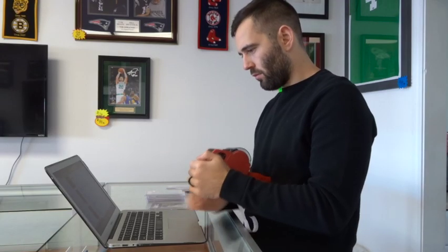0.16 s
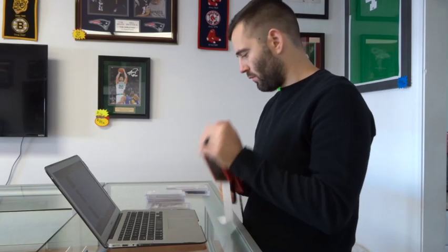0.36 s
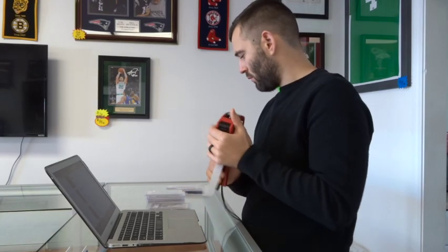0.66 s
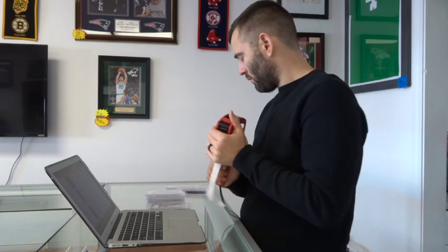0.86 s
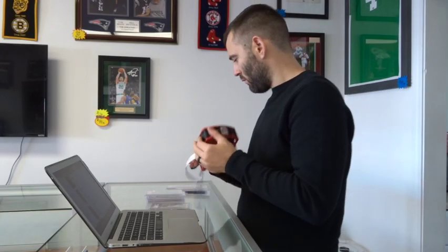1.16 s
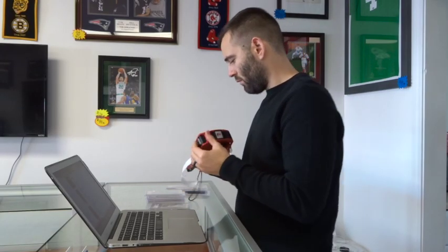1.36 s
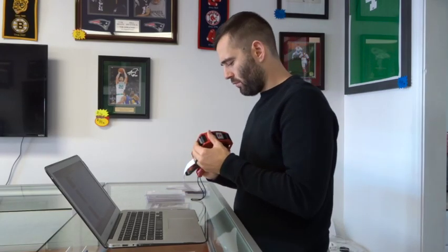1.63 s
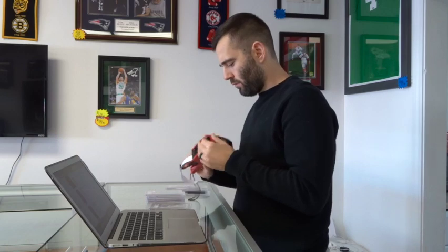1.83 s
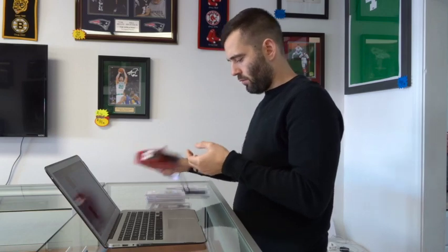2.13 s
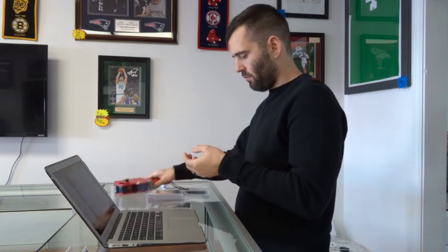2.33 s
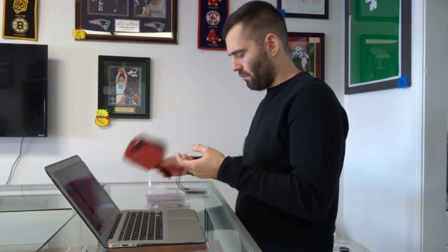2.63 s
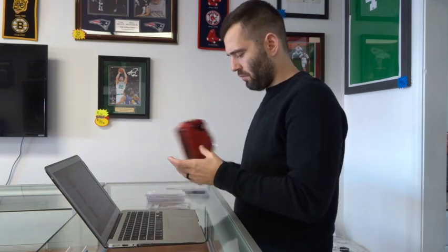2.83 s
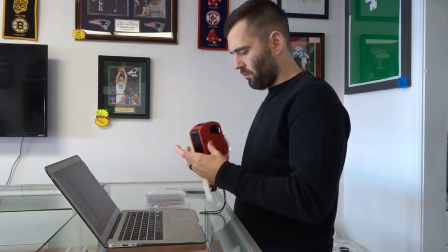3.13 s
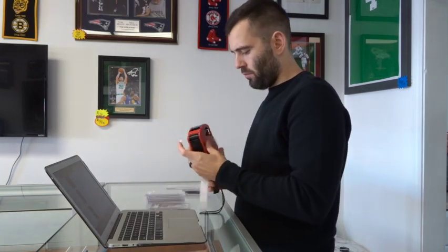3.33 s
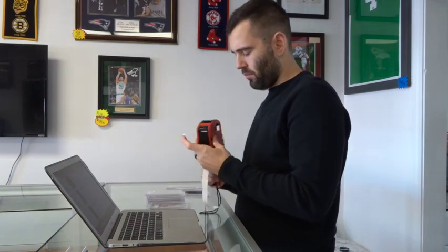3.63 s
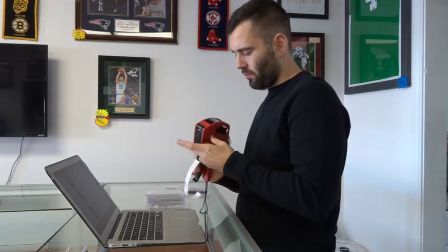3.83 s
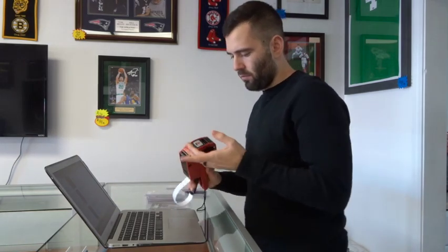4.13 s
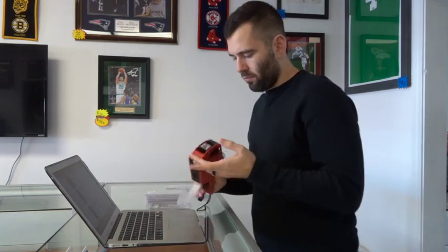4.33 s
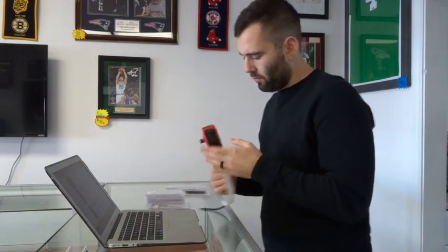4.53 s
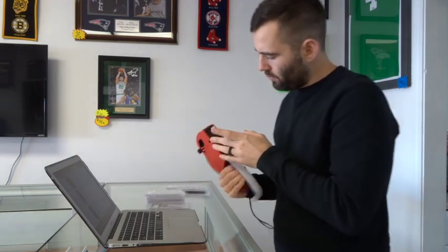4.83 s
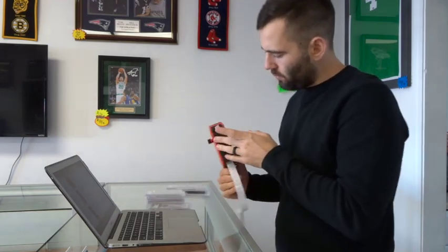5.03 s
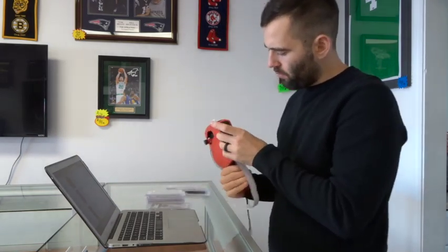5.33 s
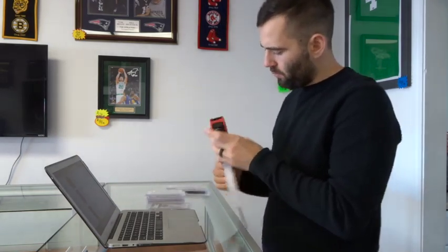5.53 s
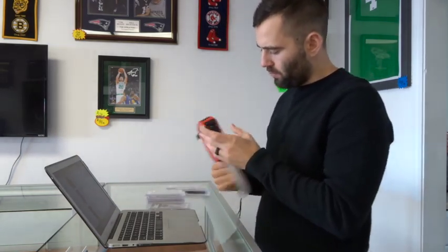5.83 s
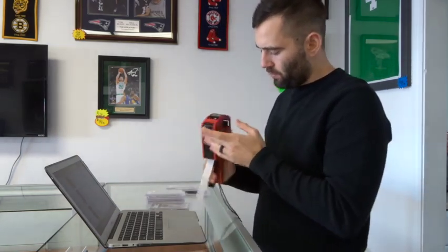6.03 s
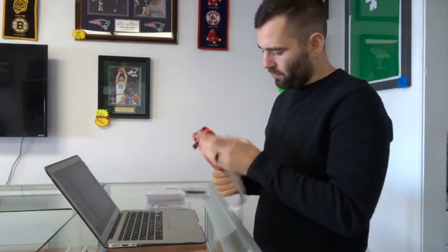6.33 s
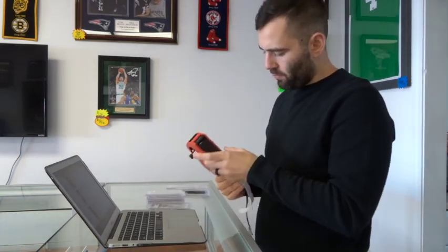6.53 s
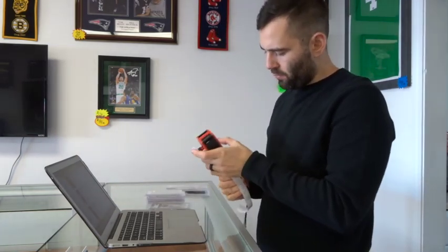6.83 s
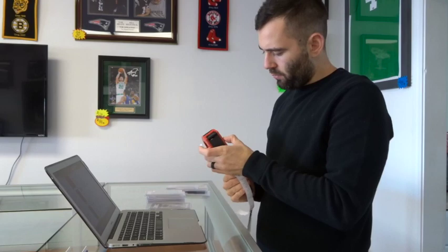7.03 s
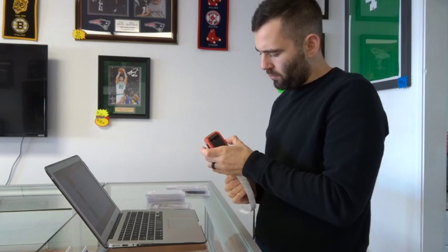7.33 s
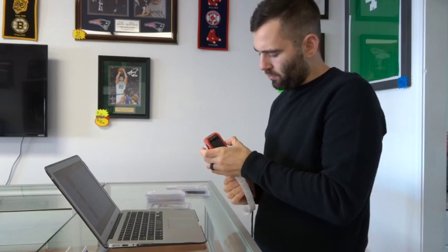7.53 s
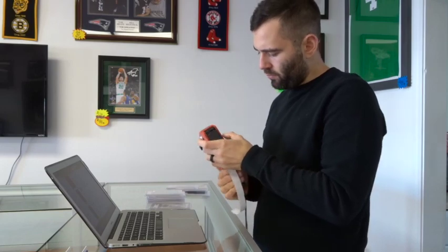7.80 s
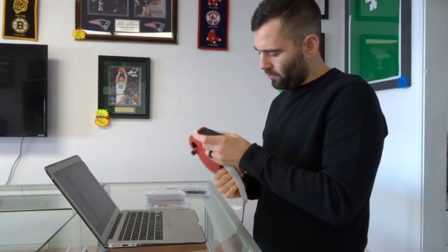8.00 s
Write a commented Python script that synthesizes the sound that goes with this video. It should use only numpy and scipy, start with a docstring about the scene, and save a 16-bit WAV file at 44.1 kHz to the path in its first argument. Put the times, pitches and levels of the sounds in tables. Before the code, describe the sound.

A man handles a plastic label gun at a glass counter. Quick clicks build to hard clacks and a rattling trigger slam, then lighter fumbling, a solid knock on the counter, a busy run of snaps and two more trigger slams. After a quieter fiddly spell come a tight crackling cluster and a few bright latch snaps. Close stereo pickup, short bright room tail, low ventilation rumble and wavering hum.

```python
"""Hard-walled shop: a hand-held plastic label gun is turned over, opened, tapped and squeezed.
Each contact is a short rattle of micro-impacts ringing hollow body, side wall, shell, edge and latch modes;
slams are runs of touches, a spring pings, the counter knocks, and random slips make a rustle.
Decaying stereo noise gives the room tail, over ventilation rumble, a wavering hum, a narrow drone and hiss."""
import sys
import numpy as np
from scipy import signal
from scipy.fft import rfft, irfft
from scipy.io import wavfile
from scipy.ndimage import uniform_filter1d

SR = 44100
rng = np.random.default_rng(int(sys.argv[2]) if len(sys.argv) > 2 else 0)


def to_wav(sig):
    """Store sig (one row per channel, or 1-D mono) as 16-bit WAV at the path in sys.argv[1].

    Samples outside -1..1 are clipped; the rate is SR.
    """
    pcm = np.clip(np.atleast_2d(sig), -1, 1) * 32767
    pcm = np.round(pcm).astype(np.int16)
    wavfile.write(sys.argv[1], SR, pcm.T)  # frames by channels


N = 360027

# Rumble, wash and hiss spectrum: pitch_hz, density_db (per Hz, relative within each layer)
AIR_SPECTRUM = [(12, -36), (20, -1), (70, -6.5), (101, -4), (136, -3.5), (182, -3), (237, -9.5), (271, -10),
                (363, -3.5), (414, -32), (570, -22.5), (1110, -29), (7130, -48.5), (10600, -50),
                (11500, -63), (15000, -107.5), (22000, -120)]
# Left-right correlation of the air: pitch_hz, correlation (0-1)
AIR_CORRELATION = [(60, 0.99), (130, 1), (270, 0.95), (580, 0.77), (1220, 0.36), (2600, 0), (5520, -0.0),
                   (11000, 0.16), (11700, .6)]
# Air levels: time_s, rumble_db, wash_db (wash before WASH_TRIM_DB)
AIR_LEVELS = [(0, -50, -58.5), (1.2, -53, -56), (3.6, -53.5, -57.5), (4.3, -51, -56), (5.5, -49.5, -58),
              (6.6, -53, -59.5), (8.16, -53, -58.5)]
WASH_TRIM_DB, HISS_DB = -1.0, -70.5
# Wavering hum: time_s, pitch_hz, level_db, octave_db
HUM_TRACK = [(0.0, 90, -57, -61), (0.72, 103, -55, -67), (1.1, 103, -53.5, -76), (1.5, 93, -57, -98),
             (2.2, 107, -61, -55), (2.75, 107.5, -55.5, -57), (3.2, 100, -61.5, -63.5),
             (4.4, 100, -69, -55.5), (5.1, 92, -63, -54), (5.4, 94, -52.5, -51), (5.75, 96, -49, -52.5),
             (5.95, 100, -58, -57.5), (7.84, 100, -52, -61), (8.16, 103, -62, -56)]
DRONE_HZ, DRONE_WIDTH_HZ, DRONE_DB = 242.2, 5.1, -58.5

# Decay of the shop: pitch_hz, t60_s
SHOP_DECAY = [(300, 0.5), (800, 0.32), (2000, 0.33), (5500, 0.38), (11000, 0.29)]
# Echo strength of the shop: pitch_hz, level_db
SHOP_LEVELS = [(300, -11), (1000, -4.5), (3000, -5), (10000, -2)]
# Left-right correlation of the echoes: pitch_hz, correlation (0-1)
SHOP_CORRELATION = [(130, 0.86), (270, 0.81), (580, 0.83), (1220, 0.87), (2600, 0.79), (5500, 0.042),
                    (11000, 0.011)]
SHOP_ONSET_S = 0.0021

# Fingers and paper strip moving on the gun: time_s, level_db (before RUSTLE_TRIM_DB)
RUSTLE_LEVELS = [(0.0, -83), (0.25, -49), (0.72, -51), (1.1, -55), (1.7, -49), (2.7, -51.5), (3.0, -65),
                 (3.3, -52.5), (4.15, -60), (4.4, -46.5), (4.9, -59.5), (5.5, -63), (6.15, -54), (6.5, -54),
                 (6.7, -73), (7.55, -84.5), (8.16, -54)]
# Broad gun resonances colouring the slips: pitch_hz, width_hz, level_db
RUSTLE_RESONANCES = [(900, 170, 4.5), (1710, 590, 5), (2370, 600, -2.5), (3900, 900, -8.5),
                     (7000, 21000, -24.5)]
RUSTLE_SLIPS_PER_S, RUSTLE_TRIM_DB = 1500, -14.5
# Loose parts shake on after each contact, relative to its level
SHAKE_DB, SHAKE_RISE_S, SHAKE_FALL_S = -32, 0.032, 0.046

# Knocks on the counter: start_s, level_db, main_pitch_hz, upper_mode_t60_s
COUNTER_KNOCKS = [(2.332, -27.5, 193, 0.063), (4.367, -34.5, 566, 0.051), (5.953, -44, 193, 0.048)]
# Spring pings: start_s, level_db
SPRING_PINGS = [(0.6983, -33.5), (2.7666, -40), (2.7894, -47), (4.5725, -42), (4.6319, -52.5),
                (4.6962, -54), (5.7453, -53), (6.2886, -54.5), (6.323, -50)]
# Spring modes: pitch_hz, level_db, t60_s
SPRING_MODES = [(4480, -3, .05), (4470, -4, 0.052), (4610, -5, .04)]

# Modes of the hollow body: pitch_hz, level_db, t60_s
HOLLOW_MODES = [(696, -13.5, 0.0082), (763, -5.5, 0.089), (806, -2.5, 0.058), (880, -1, 0.055),
                (918, -6, 0.16), (951, 5.5, 0.087), (1022.3, 1, 0.095), (1090, 1.5, 0.04)]
# Modes of the side wall: pitch_hz, level_db, t60_s
WALL_MODES = [(1511, -12.5, 0.02), (1597, -7.5, 0.027), (1635, -6.5, 0.028), (1696, -6, 0.03),
              (1860, -8, 0.014)]
# Modes of the shell: pitch_hz, level_db, t60_s
SHELL_MODES = [(2040, -3, .005), (2250, -3, .006), (2400, -6, .012), (2650, -2, .005)]
# Modes of the edge: pitch_hz, level_db, t60_s
EDGE_MODES = [(2880, -2, .005), (3100, -3, .005), (3350, -2, .006), (3650, -3, .004)]
# Modes of the latch: pitch_hz, level_db, t60_s
LATCH_MODES = [(3950, -3, .004), (4250, -2, .005), (4560, -3, .005), (4850, -3, .004)]
# Crack spectrum: pitch_hz, density_db (per Hz)
CRACK_SPECTRUM = [(4500, -31), (5400, 5), (6600, 5), (8000, -1), (9500, -1), (11500, -10)]
# Radiation of hollow, side wall, shell, edge, latch, crack: level_db
RADIATION_DB = [-3.5, -7, -3.5, -5, -2, -3.5]
# Reference pitch of shell, edge, latch: pitch_hz
CASE_PITCHES_HZ = [2350, 3200, 4400]
CASE_FALL_DB_PER_OCTAVE, CASE_SPREAD_DB = 12, 3.5  # fall away from the struck pitch; chance spread
CLICK_DB, STRIKE_SPREAD_DB = -9.5, 4  # click re mean of shell, edge, latch; unevenness of mode strikes
# Opening impact re the chatter; swell time at 10 ms rattle, growing as rattle squared
FIRST_IMPACT_DB, SWELL_MS = 16.5, 0.4
# Contacts: start_s, level_db, hollow_db, wall_db, case_db, case_pitch_hz, crack_db, rattle_ms
GUN_CONTACTS = [(0.119, -47.5, -18, -3, -12.5, 2180, -24, 8.7),
                (0.266, -38.5, -5.5, -8, -2, 2620, -11.5, 10), (0.443, -37.5, -11, -17, -12, 2760, -21, 6),
                (0.494, -31, -16.5, -13, -7.5, 2620, -32, 10), (0.577, -28, -18, -18, -4, 2770, -34, 7.8),
                (0.607, -27, -6, -9, -13, 2540, -41, 6.8), (0.628, -24.5, -10, -8, -7, 2360, -41, 5.5),
                (0.673, -28, -3, -10, -7, 2540, -25, 6.4), (0.698, -23.5, -17, -22, -7.5, 4560, -27, 8.5),
                (0.737, -19.5, -12, -12, -8.5, 2780, -21, 5.3),
                (0.769, -23.5, -13, -14, -9.5, 2100, -18, 14),
                (0.918, -19.5, -11.5, -21, -15, 2600, -24, 9.9),
                (0.937, -9, -27, -18.5, -17, 2260, -19.5, 5.7), (0.97, -19, -4, -17, -9, 2480, -15, 6.8),
                (0.979, -19, -7, -15, -3, 2040, -22, 5.6), (1.205, -35, -26, -38, -5, 2090, -17, 8.8),
                (1.817, -29.5, -7, -24, -11, 2770, -14, 10), (1.827, -30.5, -15, -27, -4, 2000, -13, 7.5),
                (1.851, -26, -28, -24, -0.5, 3200, -9, 6.9), (1.858, -23.5, -9, -18, -2.5, 3470, -13, 6.1),
                (2.156, -29, -18, -14, -11, 2320, -35, 7.5), (2.17, -35, -3, -13, -22, 2270, -33, 6.4),
                (2.33, -12, -33, -7, -5, 2450, -24, 9.1), (2.582, -29.5, -6.5, -5.5, -24, 2740, -33, 7.5),
                (2.601, -21, -12.5, -15, -26, 2100, -35, 8.8),
                (2.698, -15.5, -17, -14.5, -11, 2570, -17, 6.8),
                (2.734, -27.5, -15, -8, -9, 3260, -18, 6.2), (2.766, -34, -28, -18, -10, 4640, -17, 5.8),
                (2.841, -17, -14, -18, -15.5, 2460, -27, 6.7),
                (2.863, -13, -13.5, -23, -16, 2460, -23.5, 5.9), (2.887, -24, -7, -20, -15, 2430, -29, 8.4),
                (2.948, -11.5, -10.5, -18, -10, 2600, -9.5, 7),
                (3.162, -38.5, -12, -18, -12, 2900, -18, 9.2),
                (3.182, -35.5, -5.5, -14, -9, 2260, -16, 11.2),
                (3.204, -27, -9.5, -12, -11.5, 2500, -25, 8.1),
                (3.277, -31, -11, -11, -6.5, 2650, -23, 8.9), (3.302, -36.5, -8, -18, -3.5, 2720, -16, 6.1),
                (3.458, -43, -6, -19, -10.5, 2360, -22, 14), (3.51, -26, -16, -12, -15.5, 2310, -21, 15.4),
                (3.673, -18, -18, -13, -7.5, 2330, -12, 8),
                (3.92, -24.5, -16, -19, -12.5, 3400, -16.5, 8.6),
                (3.987, -12, -28, -27, -9, 3630, -19, 9.8),
                (4.015, -12.5, -16.5, -37, -5.5, 2550, -21, 8.1),
                (4.225, -35.5, -2.5, -5, -7.5, 2310, -24, 7.5),
                (4.368, -23.5, -19, -27, -18.5, 2050, -51, 8.6),
                (4.572, -29, -18, -11, -12, 4620, -30, 9.8), (4.632, -35, -16, -13, -13, 2270, -27, 6.1),
                (4.697, -34.5, -16, -11, -10, 2220, -34, 8.7),
                (4.771, -39.5, -13, -10, -16.5, 2330, -29, 7.9), (5.203, -40, -13, -14, -8, 2300, -38, 7.5),
                (5.576, -39, -6.5, -5.5, -11.5, 2680, -35, 6.9),
                (5.686, -32, -15, -10.5, -11.5, 2400, -29, 5.8),
                (5.745, -34.5, -16, -10, -11.5, 2310, -27, 8.3),
                (5.944, -30.5, -9.5, -7, -8.5, 2710, -24, 7), (5.954, -20, -21, -13, -7.5, 2630, -16, 7.7),
                (5.993, -22, -7, -10, -10, 2500, -28, 8.8), (6.059, -14.5, -25.5, -26, -3, 2470, -13, 9.1),
                (6.072, -18, -22, -20, -3, 2400, -17.5, 5.8), (6.085, -20.5, -27, -27, 2.5, 2790, -7, 7.8),
                (6.106, -20.5, -26, -26, -0.5, 2600, -25, 8.3),
                (6.119, -17, -16, -30, -3.5, 3100, -17.5, 9.1),
                (6.288, -36.5, -13, -8, -7.5, 2800, -23, 5.3), (6.323, -36.5, -16, -14, -24, 4510, -25, 7),
                (7.393, -43.5, -7, -9, -16, 2130, -38, 7.7), (7.485, -44.5, -12, -8, -15, 2910, -34, 7.8),
                (7.584, -24.5, -19, -16, -14.5, 2200, -23, 11),
                (7.63, -16.5, -11.5, -9, -9, 2520, -16, 9.5),
                (7.642, -13.5, -40, -25, -10.5, 4240, -5.5, 8.9),
                (7.652, -13, -28, -22, -12, 4400, -9, 10.6), (7.813, -10, -27, -21, -10, 3570, -10.5, 7.1),
                (7.893, -34.5, -17, -26, -6, 2660, -22, 8.5),
                (8.041, -34.5, -12, -34, -11, 2660, -11.5, 7.7), (8.14, -42, -4, -22, -13, 2970, -14, 9.3)]
# Trigger slams home: the contact columns for the main blow, then lead_loss_db per earlier touch
TRIGGER_SLAMS = [(0.801, 2, -19, -20, -15, 3020, -17, 8.3, 11.4),
                 (1.324, 6, -18.5, -15, -14, 3130, -19, 6.54, 8.2),
                 (3.551, 0.5, -14, -15, -12.5, 2470, -15, 9, 8),
                 (3.727, 1, -16, -13, -12.5, 2900, -12.5, 9.3, 6.5)]
TOUCH_S, REBOUND_DROP_DB, REBOUND_LOSS_DB, LIGHT_TOUCH_HOLLOW_DB = 0.0094, 4.5, 3, 5.5
# Gun moved out over the counter and back: time_s, left_minus_right_db
GUN_PLACE = [(0, -2), (1.9, -1.5), (2.2, 1.5), (2.7, -.3), (3.0, -1.5), (8.16, -1.7)]

# Recorder: gain control and top cut
LIMIT_DB, CUT_DB_PER_DB, RELEASE_DB_PER_S, CUTOFF_HZ = -17, 0.8, 164.5, 11050


def from_db(db):
    """Amplitude of a level in dB."""
    return 10 ** (np.asarray(db) / 20)


def rms_one(x):
    """Scales a signal to RMS 1."""
    return x / np.sqrt(np.mean(x ** 2) + 1e-20)


def in_time(rows):
    """Interpolates table columns to one value a sample."""
    time_s, *columns = np.transpose(rows)
    return [np.interp(np.arange(N) / SR, time_s, column) for column in columns]


def at_hz(points, hz):
    """Interpolates a table over log frequency."""
    point_hz, value = np.transpose(points)
    return np.interp(np.log(hz), np.log(point_hz), value)


def drift(rate_hz):
    """Slow random wander of RMS 1: noise through a double pole, computed every 40 samples."""
    pole = np.exp(-80 * np.pi * rate_hz / SR)
    noise = rng.standard_normal(N // 40 + 2002)
    slow = signal.lfilter([1], [1, -2 * pole, pole ** 2], noise)[2000:]  # drop the settling
    return np.interp(np.arange(N) / 40, np.arange(len(slow)), rms_one(slow))


def bands(size, correlation):
    """Half-octave bands of stereo noise: yields centre Hz and both channels, correlated via mid and side."""
    edges_hz = 20 * 2 ** np.arange(0, 9.6, .5)
    white = rng.standard_normal((2, 2, size))  # neighbouring bands use separate noise
    for k, (low_hz, high_hz) in enumerate(zip(edges_hz, edges_hz[1:])):
        band = signal.butter(2, [low_hz, high_hz], "band", fs=SR, output="sos")
        mid, side = signal.sosfilt(band, white[k % 2])
        hz = np.sqrt(low_hz * high_hz)
        alike = at_hz(correlation, hz)
        yield hz, np.sqrt(1 + alike) * mid + np.sqrt(1 - alike) * side * [[1], [-1]]


def add(out, sound, start_s):
    """Mixes a sound in at a time."""
    i = round(start_s * SR)
    out[:, i:i + sound.shape[1]] += sound[:, :N - i]


def ringing(modes, t):
    """One exponentially decaying sine a mode."""
    hz, level_db, t60_s = np.transpose(modes)[:, :, None]
    return from_db(level_db - 60 * t / t60_s) * np.sin(2 * np.pi * hz * t)


def soften(x, top_hz):
    """Low-pass: a contact of finite length excites nothing far above the part it strikes."""
    return signal.sosfilt(signal.butter(3, top_hz, fs=SR, output="sos"), x)


def air():
    """Ventilation rumble, mid-band wash of the shop and steady hiss, from shaped, drifting noise bands."""
    rumble_db, wash_db = in_time(AIR_LEVELS)
    layers = [0, 0, 0]
    for hz, noise in bands(N, AIR_CORRELATION):
        layer = int(hz > 450) + int(hz > 4000)
        layers[layer] += noise * from_db(at_hz(AIR_SPECTRUM, hz) + 1.2 * drift(2.5))
    rumble, wash, hiss = map(rms_one, layers)
    return from_db(rumble_db) * rumble + from_db(wash_db + WASH_TRIM_DB) * wash + from_db(HISS_DB) * hiss


def hum():
    """Fluttering low tone with its octave, plus a narrow drone of duct noise."""
    hz, level_db, octave_db = in_time(HUM_TRACK)
    phase = 2 * np.pi * np.cumsum(hz * (1 + 0.017 * drift(5.6))) / SR
    low = from_db(level_db + 0.83 * drift(1.3)) * np.sin(phase)
    octave = from_db(octave_db + drift(6.9)) * np.sin(2 * phase)
    duct_filter = signal.iirpeak(DRONE_HZ, DRONE_HZ / DRONE_WIDTH_HZ, SR)
    duct = signal.lfilter(*duct_filter, rng.standard_normal(N))
    return np.sqrt(2) * (low + octave) + from_db(DRONE_DB) * rms_one(duct)


def shop(x):
    """Diffuse echoes build up within a few ms and die band by band."""
    t = np.arange(SR // 2) / SR
    echoes = 0
    for hz, noise in bands(len(t), SHOP_CORRELATION):
        t60_s = at_hz(SHOP_DECAY, hz)
        even_energy = np.sqrt(2 * np.log(1000) / t60_s / SR)  # offsets the length of the decay
        echoes = echoes + noise * from_db(at_hz(SHOP_LEVELS, hz) - 60 * t / t60_s) * even_energy
    echoes *= 1 - np.exp(-(t / SHOP_ONSET_S) ** 2)
    return signal.fftconvolve(x.mean(0, keepdims=True), echoes, axes=1)[:, :N]


def rustle():
    """Clumped tiny slips through broad gun resonances; every blow stirs them up."""
    slip_chance = RUSTLE_SLIPS_PER_S * from_db(4.0 * drift(15.0)) / SR
    slips = (rng.random(N) < slip_chance) * rng.standard_normal(N)
    sound = 0
    for hz, width_hz, level_db in RUSTLE_RESONANCES:
        resonance = signal.iirpeak(hz, hz / width_hz, SR)
        sound = sound + from_db(level_db) * rms_one(signal.lfilter(*resonance, slips + 1e-18))
    t = np.arange(N) / SR
    level = from_db(in_time(RUSTLE_LEVELS)[0] + RUSTLE_TRIM_DB)
    for start_s, blow_db, *_ in GUN_CONTACTS + TRIGGER_SLAMS:
        since_s = np.clip(t - start_s, 0, 1)
        shake = (1 - np.exp(-since_s / SHAKE_RISE_S)) * np.exp(-since_s / SHAKE_FALL_S)
        level = level + from_db(blow_db + SHAKE_DB) * shake
    return level * rms_one(soften(sound, 10500))


def knocks():
    """A dull push rings three counter modes, with a puff of low noise."""
    out, t = np.zeros((2, N)), np.arange(8192) / SR
    band = signal.butter(2, [150, 800], "band", fs=SR, output="sos")
    for start_s, level_db, hz, t60_s in COUNTER_KNOCKS:
        modes = [(hz * .38, -9, .3), (hz, 0, t60_s * 2), (hz * 1.7, -4, t60_s)]
        puff = rms_one(signal.sosfilt(band, rng.standard_normal(len(t))))
        puff *= from_db(-5.0 - 60 * t / (t60_s * 4.8))
        knock = ringing(modes, t).sum(0, keepdims=True) + puff
        add(out, from_db(level_db) * knock * (1 - np.exp(-t / 0.0026)), start_s)
    return out


def spring():
    """Small metal spring: three close modes, struck unevenly at every ping."""
    out, t = np.zeros((2, N)), np.arange(4096) / SR
    for start_s, level_db in SPRING_PINGS:
        strike = from_db(STRIKE_SPREAD_DB * rng.standard_normal((1, 3)))
        ping = strike @ ringing(SPRING_MODES, t)
        add(out, from_db(level_db) * ping * (1 - np.exp(-t / .001)), start_s)
    return out


def evened(x):
    """Flattens the spectrum of a burst, so that only the struck part colours it."""
    spectrum = rfft(x)
    return irfft(spectrum / (np.abs(spectrum) + 1e-9))


def touches():
    """All contacts; each slam is two lead-up touches, the main blow and four rebounds."""
    rows = list(GUN_CONTACTS)
    for start_s, level_db, hollow_db, *rest, lead_loss_db in TRIGGER_SLAMS:
        for k, late in zip(range(-2, 5), rng.uniform(-.15, 0.17, 7)):
            loss_db = -k * lead_loss_db if k <= 0 else REBOUND_DROP_DB + k * REBOUND_LOSS_DB
            touch_s = start_s + TOUCH_S * (k + late * (k > 0))  # only rebounds are irregular
            touch_hollow_db = hollow_db + LIGHT_TOUCH_HOLLOW_DB * (k != 0)
            rows.append((touch_s, level_db - loss_db, touch_hollow_db, *rest))
    return rows


def gun_parts(t):
    """Impulse responses: modes of five parts, a high crack and a broad click."""
    mode_tables = (HOLLOW_MODES, WALL_MODES, SHELL_MODES, EDGE_MODES, LATCH_MODES)
    parts = [soften(ringing(modes, t), 1.04 * modes[-1][0]) for modes in mode_tables]
    hz = np.linspace(1, SR / 2, 129)
    crack = from_db(at_hz([(3000, -50)] + CRACK_SPECTRUM, hz))
    parts.append(irfft(crack * np.exp(-1j * hz / SR * 60))[None])  # phase delays it about 10 samples
    click = signal.lfilter(*signal.butter(2, [500, 5000], "band", fs=SR), t == 0)
    parts.append(soften(click, 6700)[None])
    return parts


def gun():
    """Every contact swells to an impact and dies in chatter; each part feels a chatter of its own."""
    out, t = np.zeros((2, N)), np.arange(3000) / SR
    parts = gun_parts(t)
    for start_s, touch_db, hollow_db, wall_db, case_db, case_hz, crack_db, rattle_ms in touches():
        octaves_away = np.abs(np.log2(np.array(CASE_PITCHES_HZ) / case_hz))
        case = case_db - CASE_FALL_DB_PER_OCTAVE * octaves_away
        varied_case = case + CASE_SPREAD_DB * rng.standard_normal(3)
        part_db = [hollow_db, wall_db, *varied_case, crack_db, np.mean(case)]
        sound = np.zeros(2 * len(t))
        swell_s = SWELL_MS / 1000 * (rattle_ms / 10) ** 2
        envelope = np.minimum(t / swell_s, np.exp((swell_s - t) * 1000 / rattle_ms))
        for modes, level_db, radiation_db in zip(parts, part_db, RADIATION_DB + [CLICK_DB]):
            rattle = rng.standard_normal(len(t)) * rng.exponential(1, len(t))
            # slow contacts have a weaker opening impact
            rattle[round(swell_s * SR)] = from_db(FIRST_IMPACT_DB) / (1 + swell_s / 0.0058)
            strike = from_db(STRIKE_SPREAD_DB * rng.standard_normal(len(modes)))
            strike *= (-1.) ** np.arange(len(modes))
            force = evened(rattle * envelope) * np.sqrt(envelope)
            ring = signal.fftconvolve(force, strike @ modes)
            loudest = np.sqrt(uniform_filter1d(ring ** 2, size=300).max())  # RMS over 7 ms
            sound[:len(ring)] += from_db(level_db + radiation_db) * ring / loudest
        # right channel at random up to one sample early or late, which widens the treble
        channels = np.array([sound, np.roll(sound, rng.integers(-1, 2))])
        add(out, from_db(touch_db) * channels, start_s - swell_s)
    out *= from_db(in_time(GUN_PLACE)[0] / 2 * np.array([[1], [-1]]))
    # too small to radiate bass
    return signal.sosfilt(signal.butter(2, 450, "high", fs=SR, output="sos"), out)


def scene():
    """Gun and counter sounds with their room tail, over air and hum."""
    near = gun() + spring() + knocks() + rustle()
    return near + shop(near) + air() + hum()


def record(dry):
    """Gain control turns loud hits down within about 2 ms, recovers steadily; the top is cut steeply."""
    level_db = 10 * np.log10(uniform_filter1d(np.mean(dry ** 2, 0), size=64) + 1e-12)
    fall_db = RELEASE_DB_PER_S * np.arange(N) / SR
    held_db = np.maximum.accumulate(level_db + fall_db) - fall_db  # peak hold with linear dB release
    cut_db = uniform_filter1d(CUT_DB_PER_DB * np.maximum(held_db - LIMIT_DB, 0), size=88)
    top_cut = signal.ellip(14, .3, 75, CUTOFF_HZ, fs=SR, output="sos")
    return signal.sosfilt(top_cut, dry * from_db(-cut_db))


dry = scene()
out = record(dry)
to_wav(out)
```